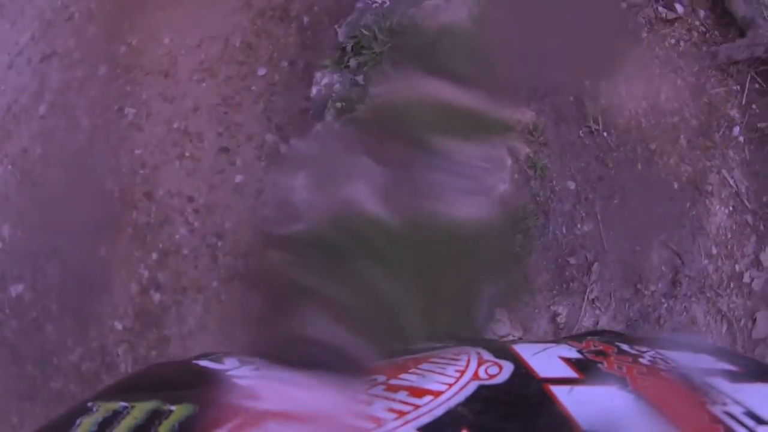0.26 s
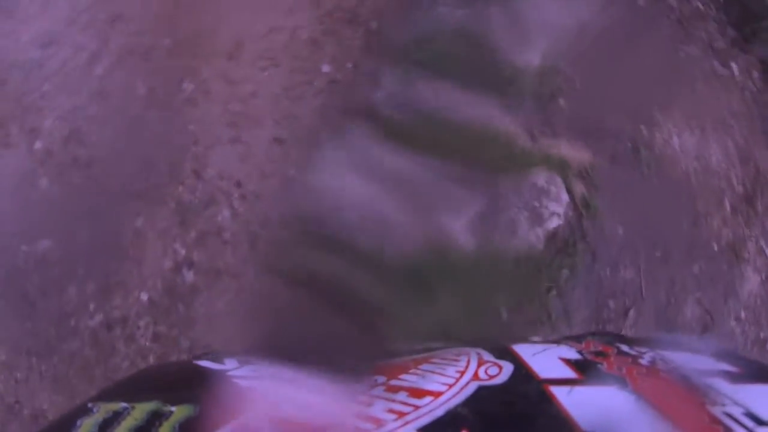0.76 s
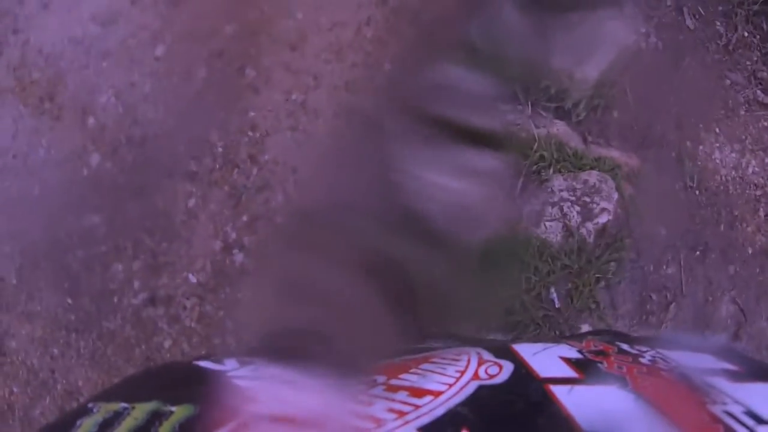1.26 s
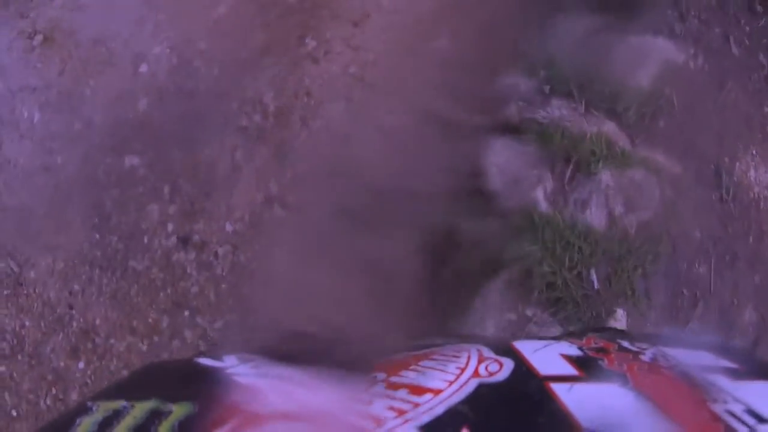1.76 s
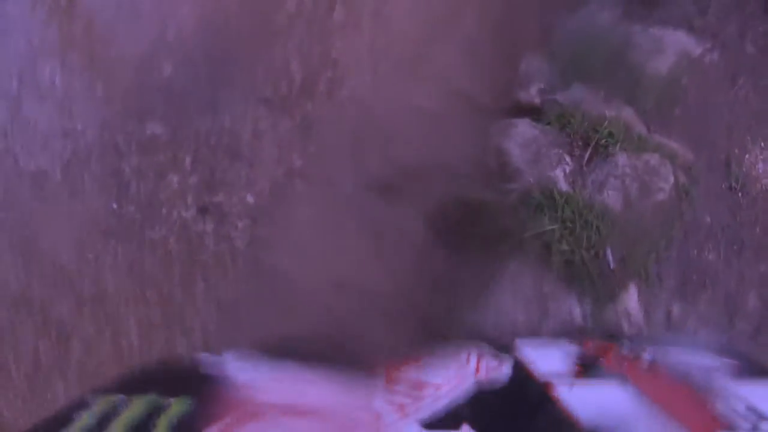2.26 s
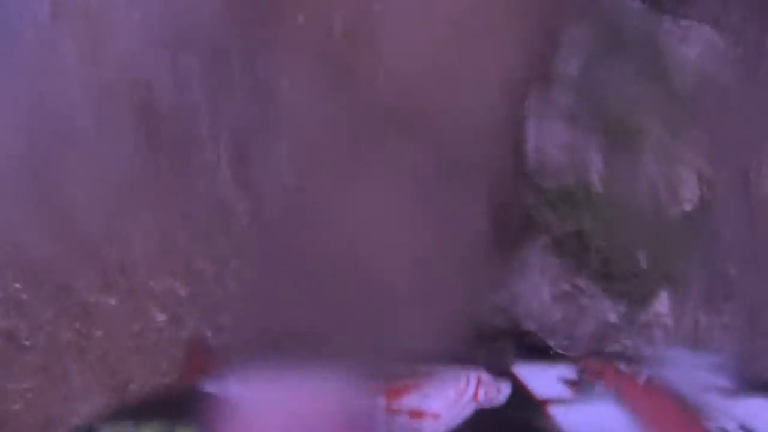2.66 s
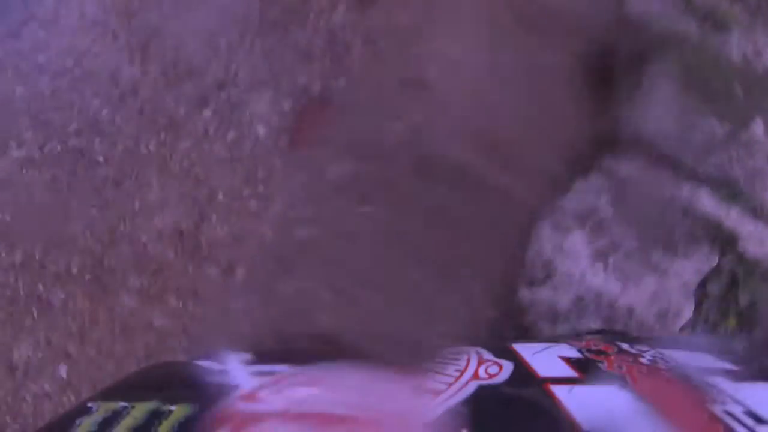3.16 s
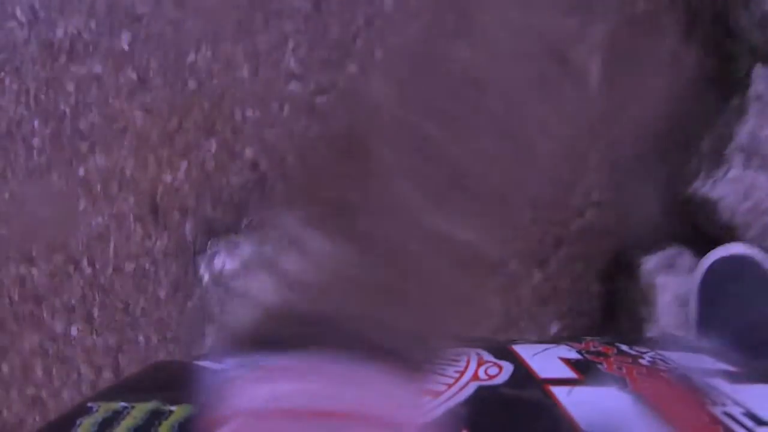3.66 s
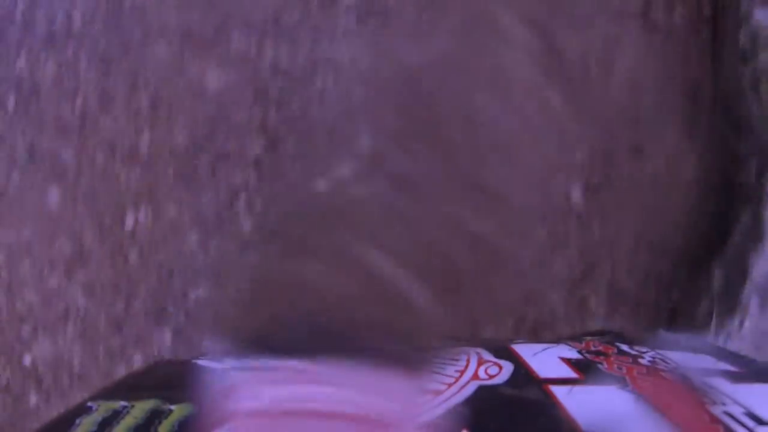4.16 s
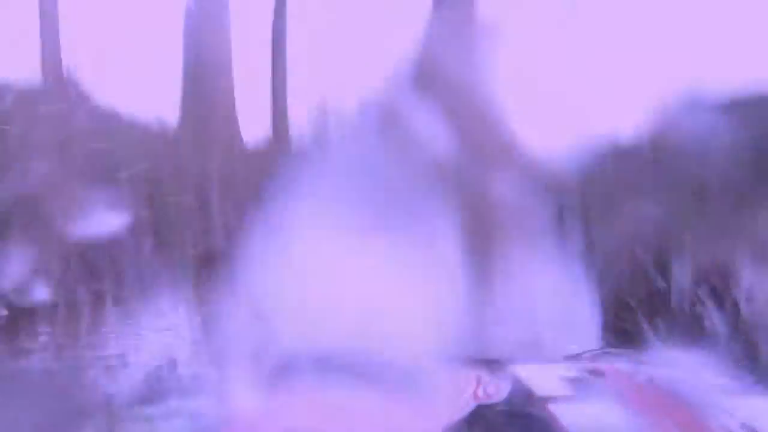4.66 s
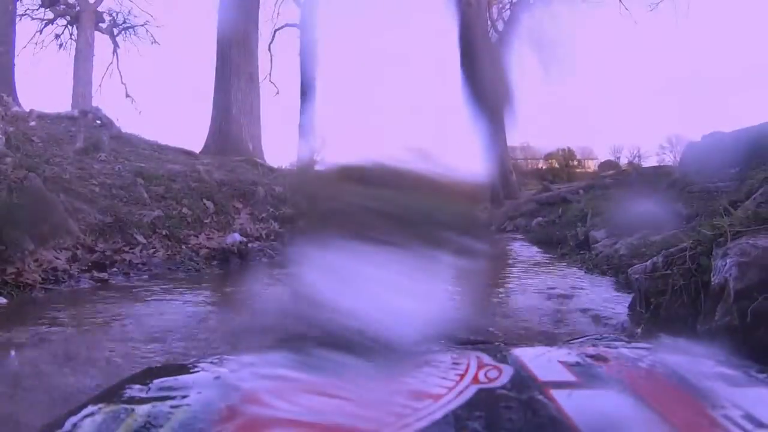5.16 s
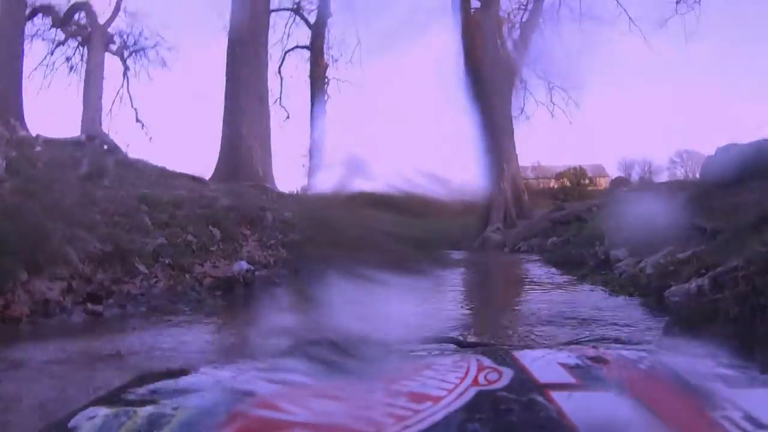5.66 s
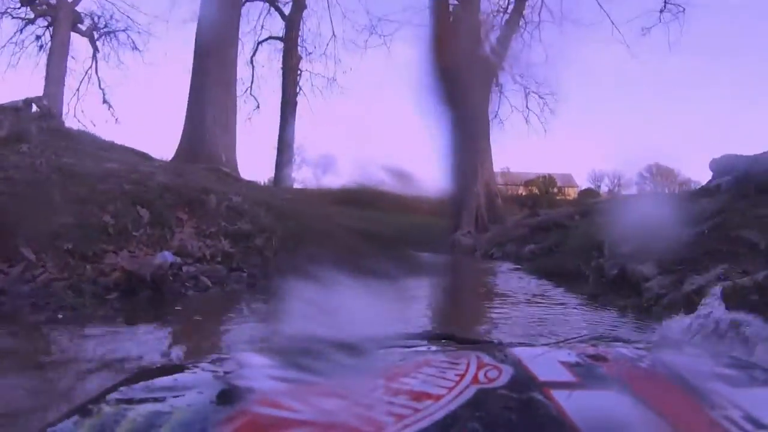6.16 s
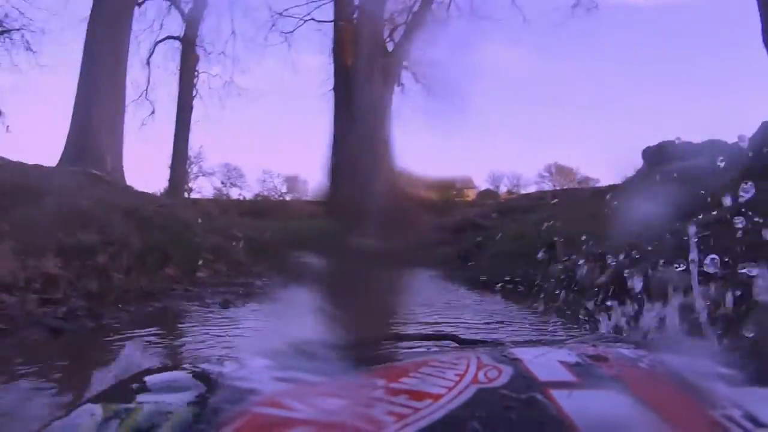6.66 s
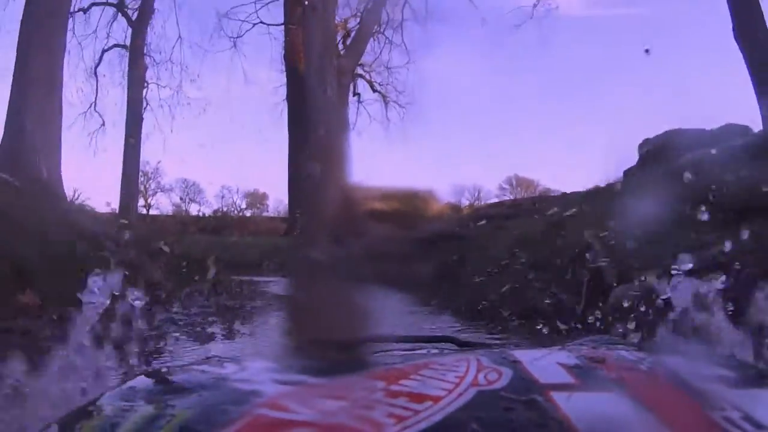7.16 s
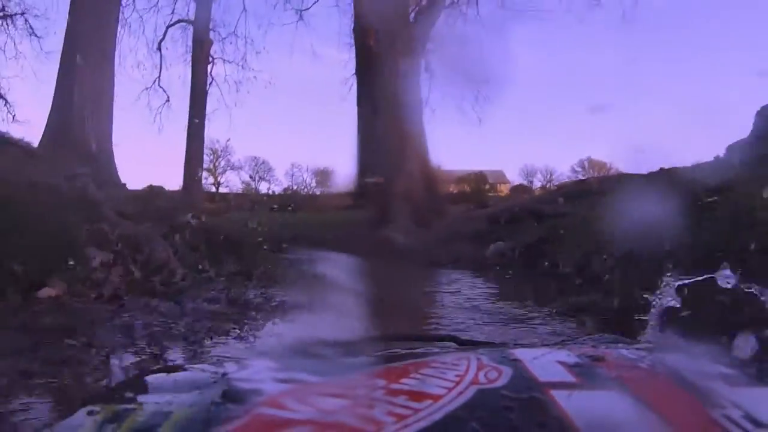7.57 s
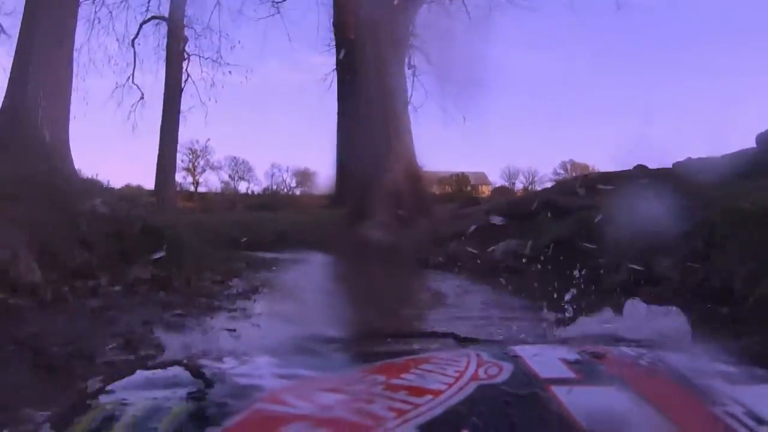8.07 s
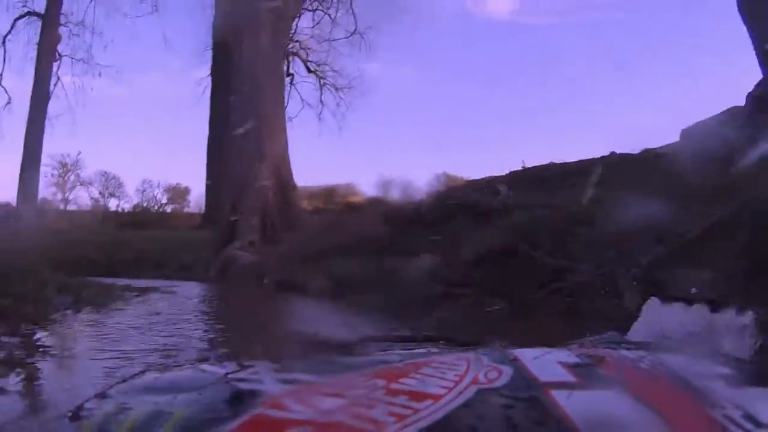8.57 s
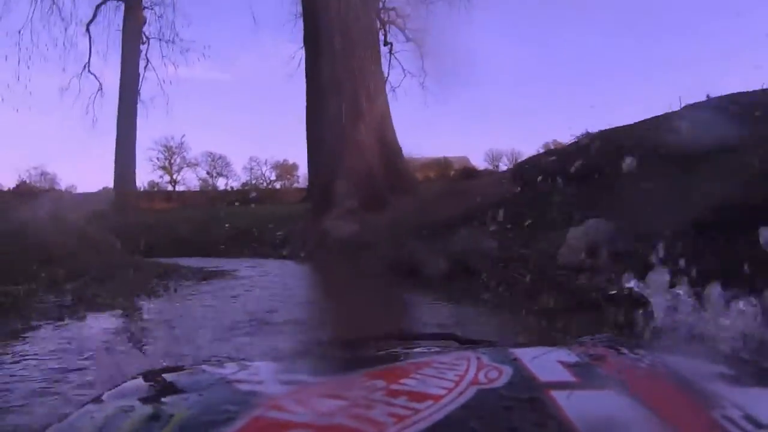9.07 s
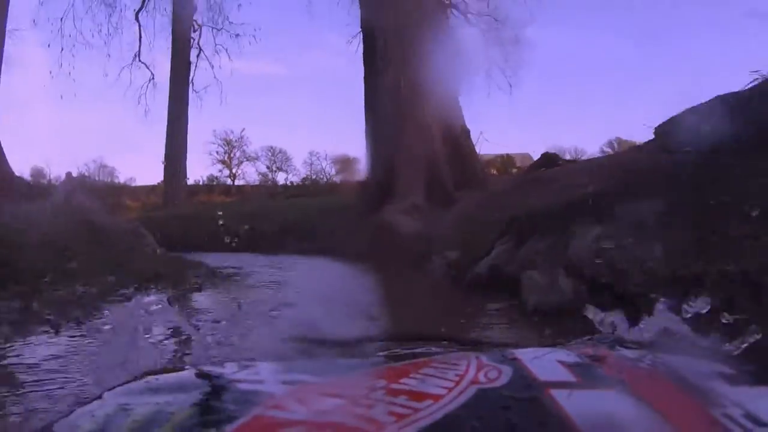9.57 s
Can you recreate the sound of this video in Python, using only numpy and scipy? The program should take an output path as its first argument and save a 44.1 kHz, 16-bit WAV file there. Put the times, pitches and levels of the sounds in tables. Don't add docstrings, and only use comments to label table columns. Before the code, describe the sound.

Everything is close, boxy and muffled, carried through a sealed case on a small electric truck outdoors. From 0 to 0.5 s, low rumble, gravel rattle and a rough tone stumbling in pitch. Hollow knocks cluster at 0.5-0.9 s; the motor climbs with a buzzing panel and duller knocks to 1.3 s, then a harsh, throbbing drone grows until 2.1 s. From 2.1 to 3.3 s the load drops and rapid, uneven wheel slaps clatter with grit as the motor winds down. It coasts, rumbling, to 4.4 s. Hard clipped thumps and cracks at 4.6-4.75 s mark the stop. Fading trickles, a small nudge at 5.3 s and a faint squeak follow in near silence. At 5.45 s it lurches off: a steady low hum near 110 Hz, wavering whine around 3.3 kHz, and churning, pounding water. Droplets tick throughout, with brief spray near 7.6, 8.3 and 8.7 s; the drive cuts back around 9.75 s.

```python
import sys
import numpy as np
from scipy import signal
from scipy.fft import rfft, irfft, next_fast_len
from scipy.io import wavfile
from scipy.ndimage import uniform_filter1d, map_coordinates

SR = 44100
rng = np.random.default_rng(int(sys.argv[2]) if len(sys.argv) > 2 else 0)


def log_audio(samples):
    frames = np.atleast_2d(samples).T
    limited = np.clip(frames, -1, 1)
    pcm = np.round(limited * 32767).astype(np.int16)
    wavfile.write(sys.argv[1], SR, pcm)


def voltage_ratio(level):
    return 10 ** (np.asarray(level, float) / 20)


N = 432621

# time_s, shaft_hz, load_db, pinion_mesh_db
MOTOR_RUN = [(0, 91.6, -68, -63), (.4, 103, -50, -50), (.55, 122.2, -52, -32), (.8, 141.3, -59, -42),
             (.86, 147.8, -60, -52), (1.3, 203.6, -58, -49), (1.45, 217, -43, -37),
             (1.65, 239.5, -37.5, -42), (1.8, 257.4, -37, -47), (1.95, 269.7, -37.5, -50),
             (2.07, 274.5, -35, -51), (2.12, 276.6, -69, -72), (3.5, 159.8, -80, -54),
             (4.5, 132.5, -87, -67)]
# centre_hz, width_hz, level_db
CASE_LOW = [(757, 53, -18.5), (1219, 200, 2.5), (1520, 280, 1), (1800, 375, 1), (2595, 830, -8.5)]
CASE_HIGH = [(3560, 530, 1), (4880, 540, 1.5), (7080, 1100, -6.5), (9000, 440, -11), (11200, 2400, -14.5)]


def unit(x):
    return x / np.sqrt(np.mean(x ** 2) + 1e-20)


def along(points, hz):
    f, v = np.transpose(points)
    return np.interp(np.log(hz + 1), np.log(f + 1), v)


def curves(rows):
    s, *columns = np.transpose(rows)
    t = np.arange(N) / SR
    gate = np.clip(np.minimum(t - s[0], s[-1] - t) * 100 + 1, 0, 1)
    return [np.interp(t, s, c) for c in columns] + [gate]


def wobble(rate):
    knots = rng.standard_normal(int(N * rate / SR) + 4)
    return map_coordinates(knots, [np.arange(N) * rate / SR])


def turns(hz):
    return 2 * np.pi * np.cumsum(hz) / SR


def filtered(x, response):
    m = next_fast_len(N + SR // 2)
    return irfft(rfft(x, m) * response(np.fft.rfftfreq(m, 1 / SR)), m)[..., :N]


def shaped(x, spectrum):
    return unit(filtered(x, lambda hz: voltage_ratio(along(spectrum, hz))))


def modes(table, wall_hz):
    def response(f):
        total = 0
        for k, (centre, width, db) in enumerate(table):
            damping = 1j * f * width
            total = total + (-1) ** k * voltage_ratio(db) * damping / (centre * centre - f * f + damping)
        return total / (1 + 1j * f / wall_hz) ** 4
    return response


def grit(per_second, spread_db):
    hit = rng.random(N) < per_second / SR
    size = voltage_ratio(spread_db * np.minimum(rng.exponential(size=N), 3))
    t = np.arange(300)
    envelope = np.exp(-t / 60) - np.exp(-t / 25)
    return rng.standard_normal(N) * (1 + np.convolve(hit * size, envelope)[:N])


def ride(levels, rumble, boom, beat, beat_db, boom_beat_db, shake_db, per_second, spread_db):
    # pitch_hz, level_db
    rattle_colour = [(290, -33), (500, -15), (631, -18), (784, -6), (897, -13.5), (1020, -0.5), (1200, 2),
                     (1320, -1.5), (1460, 0), (1570, -7), (1840, -3.5), (2000, -8.5), (2360, -11.5),
                     (2580, -21), (3000, -33.5), (3900, -33.5), (6600, -120)]
    hiss_colour = [(2200, -12.5), (2900, 0), (3400, -10), (3900, -7.5), (4500, -10.5), (4950, -9),
                   (5700, -20), (6400, -25.5), (6950, -19), (8000, -29.5), (9700, -35), (11000, -36.5),
                   (12600, -41), (13800, -59.5)]
    rumble_db, boom_db, rattle_db, hiss_db, gate = levels
    pulse = voltage_ratio(beat_db * np.cos(beat) + shake_db * wobble(30) + 0.12 * wobble(9))
    low = voltage_ratio(rumble_db) * shaped(rng.standard_normal(N), rumble)
    throb = voltage_ratio(1.22 * wobble(25) + boom_beat_db * np.cos(beat))
    shell = voltage_ratio(boom_db) * shaped(rng.standard_normal(N) * throb, boom)
    stones = grit(per_second, spread_db) * pulse
    rattle = voltage_ratio(rattle_db - 1.15) * shaped(stones, rattle_colour)
    hiss = voltage_ratio(hiss_db + 2.0) * shaped(stones, hiss_colour)
    return gate * (low + shell + rattle + hiss)


def ground(table):
    jolt_db, roll_db, gate = curves(table)
    load_db = curves(MOTOR_RUN)[1] + 73
    boom_db = -0.15 + 0.35 * jolt_db + 0.6 * roll_db - 0.14 * load_db
    hiss_db = -28 + 0.85 * roll_db + 0.18 * load_db
    return jolt_db, boom_db, roll_db, hiss_db, gate


def rocky_run(wheel_angle):
    # time_s, jolting_db, rolling_db
    rocks = [(0.0, -25, -33), (0.3, -24.5, -29), (0.6, -11, -26), (0.79, -14.5, -27.5),
             (0.84, -22.5, -33.5), (1.18, -19.5, -27.5), (1.4, -27.5, -30), (1.9, -30, -26),
             (2.13, -21.5, -29.5), (2.5, -17.5, -32), (2.7, -16, -28), (3.1, -20, -34), (3.4, -28.5, -39),
             (3.65, -39.5, -36.5), (4.15, -36.5, -30), (4.5, -23.5, -25.5), (4.62, -23.5, -26),
             (4.7, -17.5, -28.5), (4.73, -11, -15)]
    # time_s, jolting_db, rolling_db
    settling = [
        (4.74, -27, -38),
        (4.79, -27, -38),
        (4.82, -27.5, -48),
        (4.95, -35.5, -52),
        (5.1, -46, -57),
        (5.26, -49, -65),
        (5.28, -32, -48),
        (5.3, -40, -58),
        (5.33, -48, -60),
        (5.42, -52, -55),
    ]
    # pitch_hz, level_db
    rumble = [(5, -26), (10, -11), (30, 5.5), (60, 0.5), (85, -6.5), (110, -12.5), (135, -12.5),
              (250, -81.5)]
    boom = [(74, -38), (125, -13), (151, -5.5), (189, 4.5), (207, -1), (226, -8.5), (256, -13), (295, -18),
            (345, -19), (402, -14), (470, -26), (600, -26.5), (780, -62), (1320, -120)]
    moving = np.arange(N) < settling[0][0] * SR
    levels = uniform_filter1d(np.where(moving, ground(rocks), ground(settling)), size=200)
    return ride(levels, rumble, boom, wheel_angle + np.pi / 2, beat_db=0.9, boom_beat_db=1.5, shake_db=0.5,
                per_second=150, spread_db=4.5)


def water():
    # time_s, level_db
    bite = [
        (5.4, -43),
        (5.42, -27),
        (5.436, -9.5),
        (5.445, -11),
        (5.452, -2),
        (5.46, -13),
        (5.472, -9),
        (5.482, 0.5),
    ]
    # time_s, level_db
    pounding = [(5.5, -19.5), (5.7, -19), (5.88, -23.5), (6.05, -21.5), (6.35, -18), (6.6, -18),
                (6.85, -20), (7.2, -17.5), (7.55, -18), (7.8, -18.5), (7.95, -17), (8.03, -23.5),
                (8.16, -20), (8.6, -18), (9.0, -19.5), (9.22, -17), (9.31, -26), (9.38, -20), (9.56, -17),
                (9.75, -21.5)]
    on_s, off_s, fade_db_per_s, tiring_db_per_s = 5.4, 9.73, 78, 0.5
    t = np.arange(N) / SR
    throttle_db = curves(bite)[0] - fade_db_per_s * np.maximum(t - off_s, 0)
    pound_db = curves(pounding)[0] - np.mean(pounding, axis=0)[1]
    rumble_db = -20.5 + throttle_db + 0.22 * pound_db + 1.1 * wobble(3.5)
    boom_db = -17.5 + throttle_db + pound_db
    rattle_db = -21.5 + throttle_db + 0.14 * pound_db - tiring_db_per_s * (t - on_s)
    return rumble_db, boom_db, rattle_db, -46.5 + throttle_db, t > on_s


def creek_run(shaft_angle):
    # pitch_hz, level_db
    rumble = [(4.7, -36), (8.0, 0), (32, -2.5), (70, -15.5), (80, -13.5), (88, -14), (110, -15.5),
              (190, -120)]
    boom = [(79, -25), (135, -6), (151, -23), (181, -1.5), (200, 1.5), (224, -7), (254, -19), (314, -21.5),
            (355, -19), (600, -33.5), (780, -57), (1320, -120)]
    return ride(water(), rumble, boom, shaft_angle, beat_db=1.0, boom_beat_db=0.25, shake_db=1.25,
                per_second=120, spread_db=2.0)


def knocks():
    # time_s, peak_db,
    # brightness_db
    climbing = [(0.105, -25, -16), (0.3672, -18, -22), (0.5281, -12.5, -25), (0.578, -8.5, -31),
                (0.626, -13.5, -20.5), (0.669, -12, -23), (0.71, -7, -23), (0.763, -5.5, -23),
                (0.772, 0.5, -23), (0.7965, -7, -21), (0.859, -20, -34), (0.876, -18.5, -30),
                (0.938, -24, -29), (0.961, -20, -34), (1.034, -19, -34), (1.066, -16, -33),
                (1.102, -14.5, -31.5), (1.137, -15, -26), (1.174, -6, -40), (1.2041, -12.5, -28),
                (1.243, -6.5, -39), (1.2692, -14, -34), (1.3097, -3.5, -40), (2.122, -6.5, -33),
                (3.1704, -10.5, -19)]
    slapping = [(2.2403, -4.5, -30), (2.2972, -4, -24), (2.352, -5.5, -20), (2.4116, -6.5, -20.5),
                (2.4705, -4, -22), (2.505, -18, -22), (2.526, -9.5, -22), (2.587, -7, -21),
                (2.561, -16, -19), (2.623, -14.5, -21), (2.724, -17, -26), (2.788, -13, -26),
                (2.277, -23, -26), (2.321, -20, -27), (2.381, -22, -26), (2.443, -17, -26),
                (2.6478, -5.5, -18), (2.661, -13, -27), (2.692, -19, -30), (2.837, -14, -26),
                (2.906, -15, -30), (2.6827, -6.5, -19), (2.7097, -5.5, -23), (2.7473, -4, -20),
                (2.7722, -6, -21), (2.809, -5, -22), (2.833, -11, -27), (2.8707, -8, -18.5),
                (2.8956, -13, -29), (2.94, -7, -20), (2.96, -14, -26), (2.99, -16, -17), (3.014, -6, -24.5),
                (3.077, -5.5, -23), (3.099, -9, -25), (3.1545, -11, -24), (3.227, -13, -29),
                (3.2518, -2.5, -23), (3.2956, -17.5, -29), (3.3255, -12, -23)]
    stopping = [(4.389, -15, -30), (4.6318, -7.5, -23.5), (4.645, -7, -27), (4.651, -7.5, -24),
                (4.657, -20, -28), (4.696, -32, -33), (4.731, -10, -28), (4.758, -22, -22),
                (4.789, -30, -24), (4.665, -9, -21), (4.6813, -0.5, -20.5), (4.7145, -1.5, -20),
                (4.722, -11, -19), (4.78, -23, -25), (4.9565, -32, -22), (5.1284, -37, -30),
                (5.139, -36.5, -23), (5.2753, -32, -36), (5.334, -35, -26), (5.4015, -33, -32),
                (5.4293, -25, -33), (5.435, -17, -40), (5.45, -20, -32), (5.485, -7.5, -47)]
    t = np.arange(SR // 25) / SR
    tones = np.zeros(N + SR)
    ring = np.zeros((2, N + SR))
    crack = np.zeros((2, N + SR))
    lead_s = 0.0025
    for s, db, bright_db in climbing + slapping + stopping:
        noise = rng.standard_normal((3, len(t)))
        low, high, slow = rng.standard_normal(3)
        dull = bright_db < -31
        hz = 1282 * np.exp(0.064 * low)
        rise_s = 0.0019 * np.exp(0.25 * slow)
        swell = t / rise_s * np.exp(1 - t / rise_s)
        partner = (0.15 if dull else 0.45) * np.sin(2 * np.pi * hz * 1.25 * np.exp(0.1 * high) * t)
        chatter = voltage_ratio(4 * unit(uniform_filter1d(noise[2], size=90)))
        at = round(s * SR)
        tones[at:][:len(t)] += voltage_ratio(db - 6.5) * (np.sin(2 * np.pi * hz * t) + partner) * swell
        decay = voltage_ratio(-60 * t / 0.035) * np.minimum(t / 0.0021, 1)
        ring[int(dull), at:][:len(t)] += voltage_ratio(db + 8.0) * noise[0] * chatter * decay
        tilt_db = 4 * high * np.array([[1], [-1]])
        crack_level = voltage_ratio(db + tilt_db + 1.445 * bright_db + 24.5)
        decay = voltage_ratio(3 - 60 * t / 0.032) * np.minimum(t / 0.0055, 1) ** 2
        crack[:, round((s - lead_s) * SR):][:, :len(t)] += crack_level * noise[1] * chatter * decay
    bright_ring = filtered(ring[0, :N], modes(CASE_LOW, wall_hz=5000))
    dull_ring = filtered(ring[1, :N], modes(CASE_LOW[:3], wall_hz=3500))
    low_crack = filtered(crack[0, :N], modes(CASE_HIGH[:2], wall_hz=6200))
    high_crack = filtered(crack[1, :N], modes(CASE_HIGH[2:], wall_hz=6400))
    return tones[:N] + bright_ring + dull_ring + low_crack - high_crack


def slams():
    # time_s, bounce_hz, length_s, level_db
    bounces = [
        (4.634, 43.7, 0.044, -5.5),
        (4.684, 39, 0.062, -16),
        (4.717, 52.7, 0.0208, -9),
        (4.744, 26, 0.014, -18),
        (5.269, 35.2, 0.069, -36),
        (5.454, 36.4, 0.032, -7.5),
    ]
    out = np.zeros(N + SR)
    for s, hz, length, db in bounces:
        t = np.arange(int(length * SR)) / SR
        fade = np.clip(np.minimum(t, length - t) / 0.0044, 0, 1)
        out[round(s * SR):][:len(t)] += voltage_ratio(db) * fade * np.tanh(3.2 * np.sin(2 * np.pi * hz * t))
    return out[:N]


def wheels():
    # time_s, wheel_hz
    speed = [(0, 7.6), (.14, 8.6), (.58, 11.04), (.86, 12), (1.3, 14.98), (1.55, 18.21), (1.8, 22.13),
             (2.04, 14.97), (2.16, 17.47), (2.45, 17.06), (2.8, 16.3), (3.2, 13.54), (4.0, 12),
             (4.43, 11.1), (4.62, 8.6)]
    # time_s, level_db
    egg_shape = [(0.0, -21), (0.14, -30), (0.58, -15), (0.86, -23.5), (1.52, -24.5), (1.81, -17.5),
                 (2.12, -17), (2.44, -29), (2.82, -27), (3.2, -41), (4.0, -28.5), (4.43, -25), (4.62, -18)]
    hz, gate = curves(speed)
    second_db = curves(egg_shape)[0]
    octaves = np.log2(hz / 16.35)
    first_db = -15 + 39 * np.minimum(octaves, 0) + 2.0 * wobble(4.61)
    third_db = -44.5 - 14.5 * octaves + 4 * wobble(3.8)
    fourth_db = second_db - 19.5 + 3 * wobble(4.0)
    fifth_db = third_db - 5.0 + 3 * wobble(5.3)
    angle = turns(hz)
    levels = [first_db, second_db, third_db, fourth_db, fifth_db]
    shake = sum(voltage_ratio(db) * np.sin((k + 1) * angle + k) for k, db in enumerate(levels))
    return gate * np.sqrt(2) * shake, angle


def motor(wheel_angle):
    # shaft_multiple, level_db
    orders = [(3, 10), (3.3, 3), (3.7, 2.5), (4.6, -6.5), (5.4, -11), (6.3, 2), (7, -14), (9, -6),
              (13.5, -14.5), (15, -14), (16.3, -10.5)]
    # start_s, end_s, level_db
    smooth = [
        (1.36, 2.104, -40),
        (3.399, 4.45, -35),
    ]
    # centre_hz, width_hz, level_db
    tub = [(802, 43, 0)]
    hz, load_db, mesh_db, gate = curves(MOTOR_RUN)
    steady = sum(voltage_ratio(db) * curves([(start, db), (end, db)])[1] for start, end, db in smooth)
    shaft = steady * voltage_ratio(0.83 * wobble(8.2)) * np.sin(turns(hz))
    swaying = turns(hz * (1 + 0.025 * wobble(300)))
    loaded = sum(voltage_ratio(db + 3.6 * wobble(120)) * np.sin(k * swaying) for k, db in orders)
    load_level = voltage_ratio(load_db + 7.5 + 4.2 * np.cos(2 * wheel_angle + 0.3))
    rough = load_level * filtered(loaded, modes(CASE_LOW + CASE_HIGH[:2], wall_hz=4960))
    sway_hz = 230 * (100 / hz) ** 1.3
    pinion_teeth = 13
    mesh_hz = pinion_teeth * hz + 1.3 * sway_hz * np.cos(2 * wheel_angle) + 30 * wobble(200)
    throb_db = 3.5 * np.cos(wheel_angle + 1.6) + 5.5 * np.sin(2 * wheel_angle) - 1 + 2.5 * wobble(130)
    mesh = voltage_ratio(mesh_db) * voltage_ratio(throb_db) * np.sin(turns(mesh_hz))
    drone_level = np.clip((hz - 222) / 15, 0, 1) * voltage_ratio(load_db + 2.5 + 5 * np.cos(2 * wheel_angle + 0.33))
    drone = drone_level * unit(filtered(rng.standard_normal(N), modes(tub, wall_hz=4000)))
    return gate * (drone + shaft + rough + mesh)


def drive():
    # time_s, pitch_hz, level_db
    shaft_hum = [(5.45, 100.9, -29), (5.5, 104.2, -21), (6.04, 111.9, -18), (7.9, 112.3, -19),
                 (7.96, 106.6, -24), (8.32, 112.9, -19.5), (9.75, 113.5, -20.5), (9.81, 121, -26)]
    # time_s, pitch_hz
    mesh_pitch = [(5.6, 3400), (5.75, 3290), (5.93, 3235), (6.05, 3172), (6.45, 3150), (6.56, 3270),
                  (6.8, 3225), (7.0, 3260), (7.15, 3222), (7.52, 3255), (7.63, 3460), (7.76, 3425),
                  (7.92, 3420), (8.0, 3480), (8.3, 3465), (8.5, 3410), (8.88, 3380), (8.97, 3465),
                  (9.15, 3455), (9.26, 3392), (9.66, 3395), (9.76, 3240)]
    # time_s, level_db
    singing = [(5.58, -51), (5.62, -43.5), (5.95, -43.5), (6.02, -53), (6.07, -44), (6.42, -45), (6.5, -46),
               (6.65, -43.5), (7.5, -44), (7.6, -43), (8.05, -39.5), (8.4, -45), (8.8, -43), (9.05, -39),
               (9.25, -43.5), (9.45, -41), (9.7, -44), (9.77, -65)]
    hum_hz, hum_db, hum_gate = curves(shaft_hum)
    mesh_hz = curves(mesh_pitch)[0]
    mesh_db, mesh_gate = curves(singing)
    angle = turns(hum_hz + 1.19 * wobble(5))
    hum = voltage_ratio(hum_db + 1.75 * wobble(11)) * np.sin(angle + 0.6 * wobble(17))
    mesh = turns(mesh_hz + 8 * wobble(9) + 16 * wobble(40) + 20 * wobble(170))
    upper = np.clip((mesh_hz - 3150) / 600, 0.1, 1) * voltage_ratio(4.4 * wobble(70))
    flicker = voltage_ratio(2.0 * wobble(30) + 2.2 * wobble(110) - 0.8) + 0.4 * wobble(420)
    whine = flicker * np.sin(mesh) + upper * np.sin(mesh + angle + 1.0 * wobble(60))
    whine = whine + 0.067 * np.sin(mesh - angle) + 0.016 * np.sin(2 * mesh)
    return np.sqrt(2) * (hum_gate * hum + mesh_gate * voltage_ratio(mesh_db + 2.5) * whine), angle


def stumbling():
    # time_s, pitch_hz, level_db
    catches = [(0, 1400, -31), (.035, 975, -28), (.055, 1050, -44), (.095, 1450, -46), (.108, 1450, -31),
               (.14, 1150, -29), (.165, 1300, -36), (.185, 1480, -34), (.2, 1300, -36), (.217, 1130, -29),
               (.235, 1250, -44), (.258, 1520, -33), (.28, 1100, -28), (.297, 1200, -45), (.327, 1400, -29),
               (.345, 1500, -44), (.372, 1600, -29), (.395, 1480, -38), (.41, 1450, -32), (.43, 1780, -33),
               (.47, 1500, -44)]
    hz, db, gate = curves(catches)
    smooth_hz = uniform_filter1d(hz, size=250)
    tone = np.sin(turns(smooth_hz + 35 * wobble(200)))
    return gate * voltage_ratio(db + 2.0 * wobble(121)) * np.sqrt(2) * tone


def buzzing():
    # time_s, level_db
    loudness = [(1.02, -48), (1.1, -34), (1.2, -33), (1.3, -31), (1.4, -38), (1.46, -44)]
    # centre_hz, width_hz, level_db
    panel = [(1250, 91, 0)]
    db, gate = curves(loudness)
    taps = grit(per_second=300, spread_db=7.5)
    return gate * voltage_ratio(db + 2.5 * wobble(60)) * unit(filtered(taps, modes(panel, wall_hz=4000)))


def drops():
    # time_s, peak_db
    sharp = [(0.575, -31), (0.606, -38), (0.71, -34), (0.7715, -28), (0.98, -44), (2.4365, -40),
             (2.64, -39.5), (2.7088, -31), (3.012, -34), (3.053, -44), (3.1725, -42), (3.2, -46),
             (4.445, -45), (4.4767, -42), (4.595, -39.5), (4.672, -34), (4.7125, -26), (8.231, -38),
             (8.3824, -31), (8.6697, -35), (8.685, -26.5)]
    flung = [(5.4964, -45), (5.6316, -42), (5.88, -47), (5.9454, -47), (5.9888, -44), (6.0646, -46),
             (6.346, -40), (6.4038, -47), (6.7575, -40), (6.7979, -37.5), (6.8513, -39), (6.9072, -36.5),
             (7.0254, -41), (7.2235, -39.5), (7.3178, -40), (7.3447, -39.5), (7.4195, -49), (7.4754, -45),
             (7.5078, -39), (7.8291, -36), (8.102, -42), (8.2003, -37), (8.2477, -35), (8.3075, -38),
             (8.5904, -41), (8.6123, -40), (8.7266, -39), (8.8064, -47), (8.8388, -37), (8.9436, -45),
             (8.9795, -37), (9.0932, -45), (9.1491, -43), (9.2184, -37), (9.3137, -41), (9.3761, -46),
             (9.7612, -44), (9.7984, -41)]
    thrown = [(0.3721, -50), (0.4184, -57), (0.4733, -46), (0.5177, -48), (0.8719, -47), (1.053, -48),
              (1.1194, -45), (1.1882, -47), (1.2555, -47), (1.6108, -47), (1.6307, -42), (1.6796, -38.5),
              (1.7765, -43), (1.8926, -45), (2.142, -42), (2.2014, -45), (2.261, -44), (2.3144, -43),
              (2.3694, -44), (2.4625, -38), (2.4945, -42), (2.5394, -47), (2.614, -44), (2.8389, -43),
              (2.928, -42), (3.1193, -49), (3.283, -47), (3.437, -59), (4.7566, -51), (4.789, -46),
              (4.8344, -58), (4.8783, -63), (4.9043, -60), (4.974, -58), (5.0864, -61), (5.1652, -64)]
    # start_s, length_s, level_db
    sheets = [
        (4.617, 0.033, -45),
        (4.726, 0.018, -35.5),
        (4.75, 0.059, -53),
        (5.262, 0.0087, -61),
        (7.617, 0.023, -47),
        (8.239, 0.043, -38),
        (8.381, 0.031, -36.5),
        (8.674, .04, -32.5),
    ]
    ticks = np.zeros((2, N + SR))
    t = np.arange(SR // 100) / SR
    envelope = voltage_ratio(-60 * t / 0.011) * np.minimum(t / 0.002, 1) * 1.4
    for k, (s, db) in enumerate(sharp + flung + thrown):
        soft = int(k >= len(sharp))
        ticks[soft, round(s * SR):][:len(t)] += voltage_ratio(db + 21.0) * rng.standard_normal(len(t)) * envelope
    clock = np.arange(N) / SR
    spray = np.zeros(N)
    for s, length, db in sheets:
        spray += voltage_ratio(db + 12.5) * (clock > s) * np.clip((s + length - clock) / 0.019, 0, 1)
    sheet = spray * unit(grit(per_second=1800, spread_db=8.5))
    sharp_sound = filtered(ticks[0, :N], modes(CASE_HIGH[1:], wall_hz=13800))
    soft_sound = voltage_ratio(3.5) * filtered(ticks[1, :N], modes(CASE_LOW[3:] + CASE_HIGH, wall_hz=9000))
    return sharp_sound + soft_sound + filtered(sheet, modes(CASE_LOW + CASE_HIGH, wall_hz=12000))


def pelting():
    # time_s, hits_per_s, level_db
    shower = [(.4, 20, -53), (1.2, 40, -56), (2.2, 30, -43.5), (2.7, 170, -40), (3.3, 40, -44.5),
              (3.6, 10, -57), (4.7, 20, -38), (4.85, 1, -62), (5.47, 1, -62), (5.5, 70, -48.5),
              (9.81, 70, -45.5)]
    per_second, db, gate = curves(shower)
    struck = rng.random((2, N)) < per_second / SR / 2
    hits = struck * voltage_ratio(db + 19.5 + 4.5 * rng.standard_normal((2, N)))
    t = np.arange(300)
    envelope = 1.6 * (np.exp(-t / 40) - np.exp(-t / 26))
    bursts = [np.convolve(h, envelope)[:N] * rng.standard_normal(N) for h in hits]
    bright = filtered(bursts[0], modes(CASE_HIGH[2:], wall_hz=12900))
    full = filtered(bursts[1], modes(CASE_LOW[1:] + CASE_HIGH, wall_hz=8900))
    return gate * (bright + voltage_ratio(2.5) * full)


def murmur():
    db, gate = curves([(4.75, -47), (5.3, -63)])
    trickle = grit(per_second=140, spread_db=7.0) * voltage_ratio(3.2 * wobble(46))
    case = modes(CASE_LOW[1:] + CASE_HIGH[:1], wall_hz=3500)
    pool = modes([(1300, 900, 0)], wall_hz=9000)
    return gate * voltage_ratio(db) * unit(filtered(trickle, lambda f: case(f) * pool(f)))


def controller():
    # time_s, falling_hz, rising_hz, level_db
    switching = [(0, 11880, 12230, -80), (.8, 11740, 12370, -82), (2.05, 11470, 12650, -86),
                 (2.1, 11460, 12660, -130)]
    down_hz, up_hz, db, gate = curves(switching)
    return gate * voltage_ratio(db) * (np.sin(turns(down_hz)) + 0.6 * np.sin(turns(up_hz)))


def floor():
    # time_s, pitch_hz, level_db
    squeak = [(5.34, 5620, -77), (5.385, 5530, -76)]
    hz, db, gate = curves(squeak)
    colour = [(900, -33), (1500, -1.0), (5000, -9.5), (13000, -17), (15000, -60.0)]  # pitch_hz, level_db
    hiss = voltage_ratio(-84) * shaped(rng.standard_normal(N), colour)
    return hiss + gate * voltage_ratio(db) * np.sin(turns(hz + 30 * wobble(150)))


def scene():
    wobbling, wheel_angle = wheels()
    geared, shaft_angle = drive()
    running = rocky_run(wheel_angle) + creek_run(shaft_angle)
    machine = wobbling + motor(wheel_angle) + geared + stumbling() + buzzing() + controller()
    struck = knocks() + slams() + drops() + pelting()
    return (running + machine + struck + murmur() + floor())[None]


def band_limit(x):
    return signal.sosfilt(signal.butter(12, 15260, fs=SR, output="sos"), x)


def record(dry):
    soft = dry / (1 + np.abs(dry / 0.95) ** 8) ** (1 / 8)
    top_hz = 12900
    dull = filtered(soft, lambda hz: 1 / np.sqrt(1 + (hz / top_hz) ** 24))
    return band_limit(dull)


dry = scene()
out = record(dry)
log_audio(out)
```